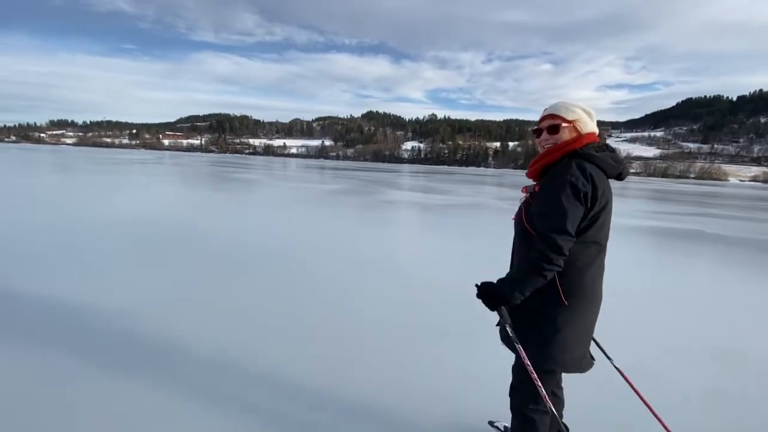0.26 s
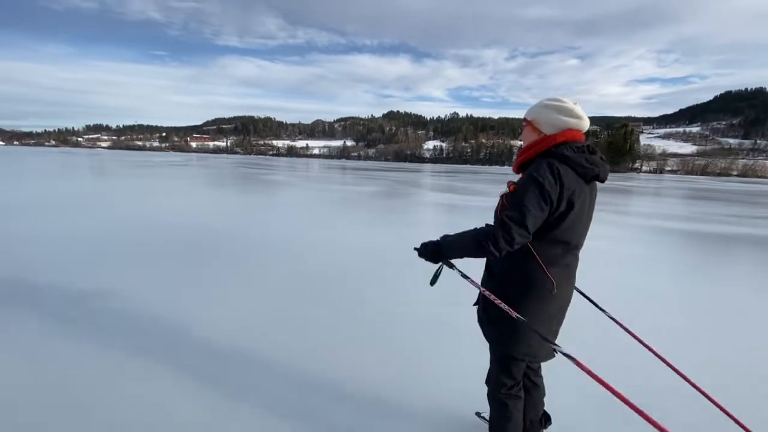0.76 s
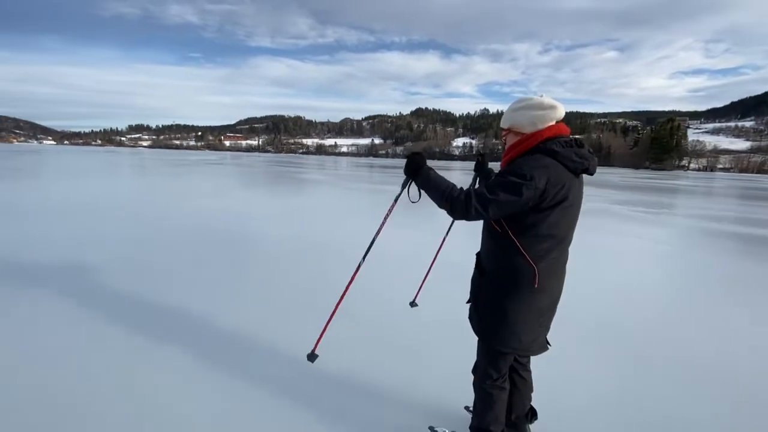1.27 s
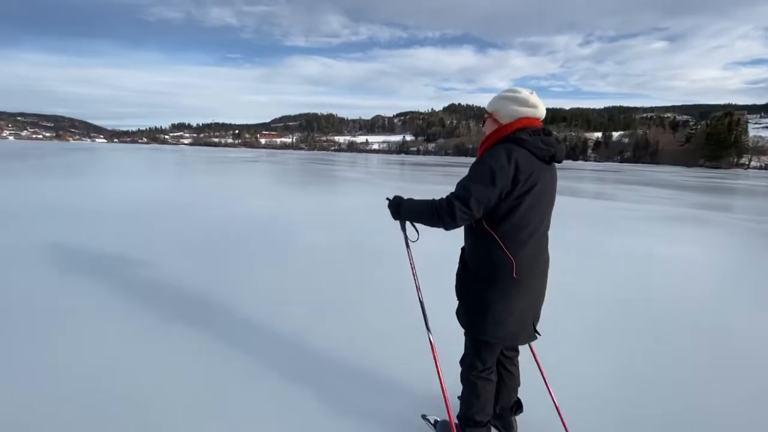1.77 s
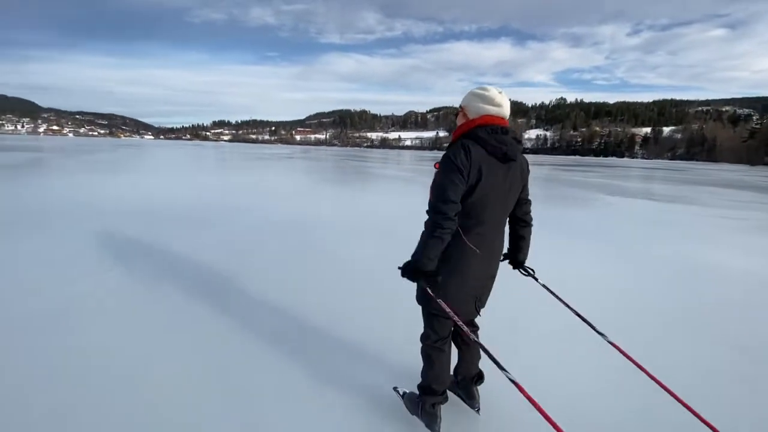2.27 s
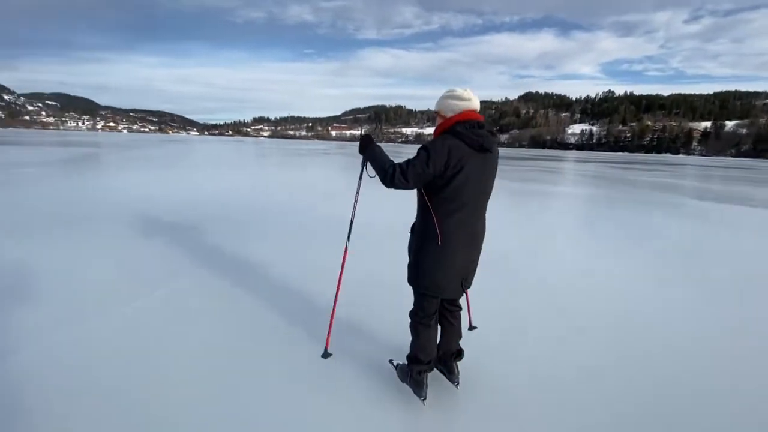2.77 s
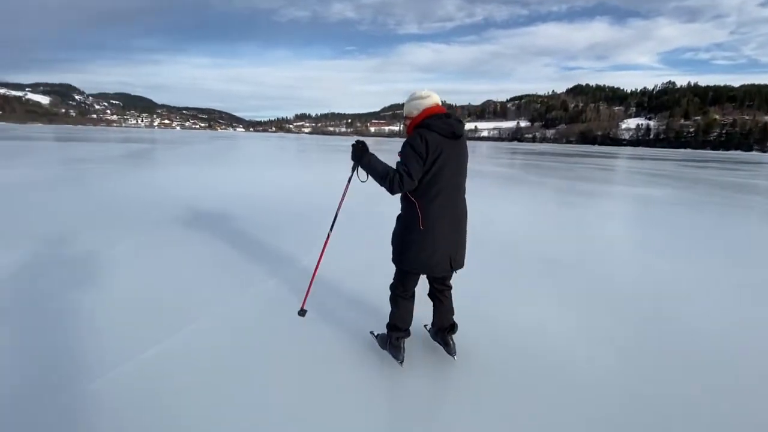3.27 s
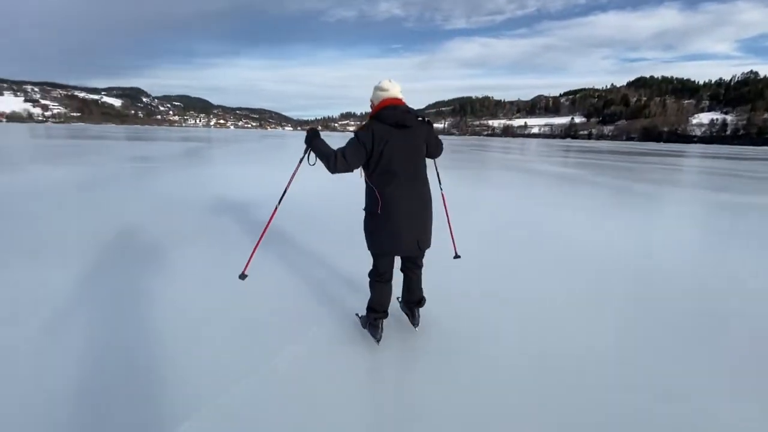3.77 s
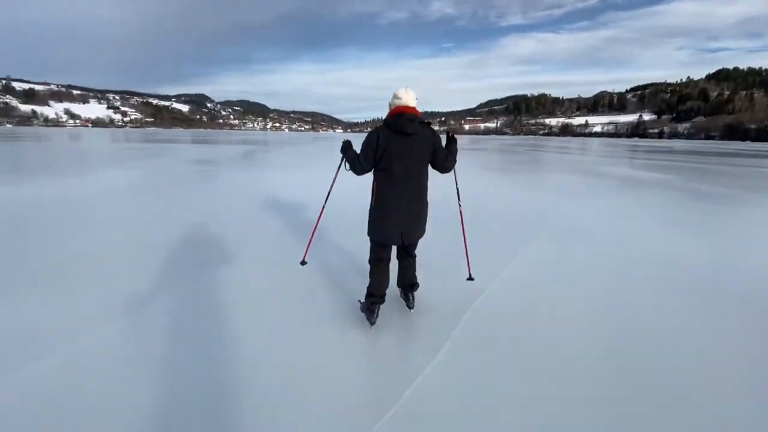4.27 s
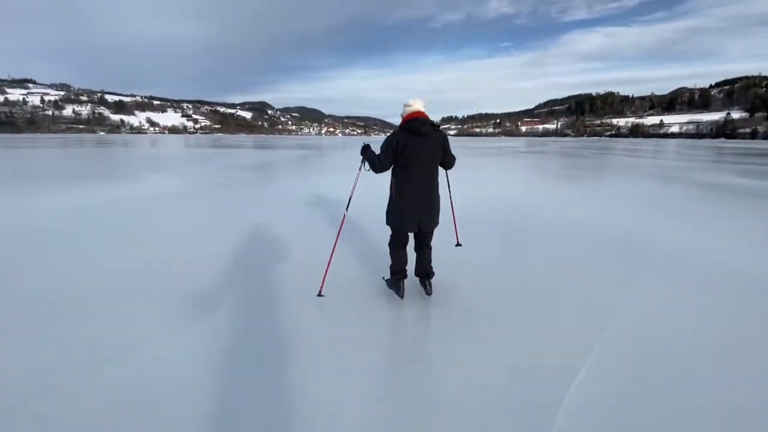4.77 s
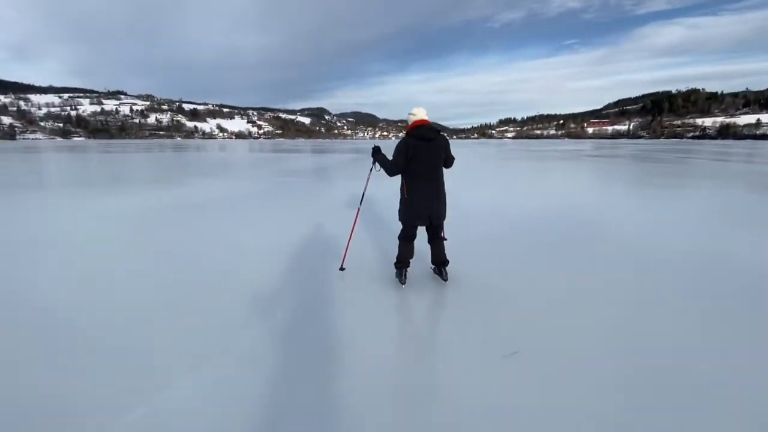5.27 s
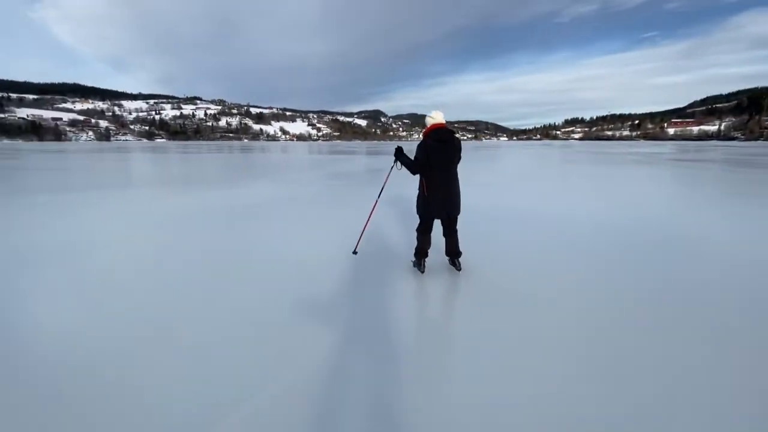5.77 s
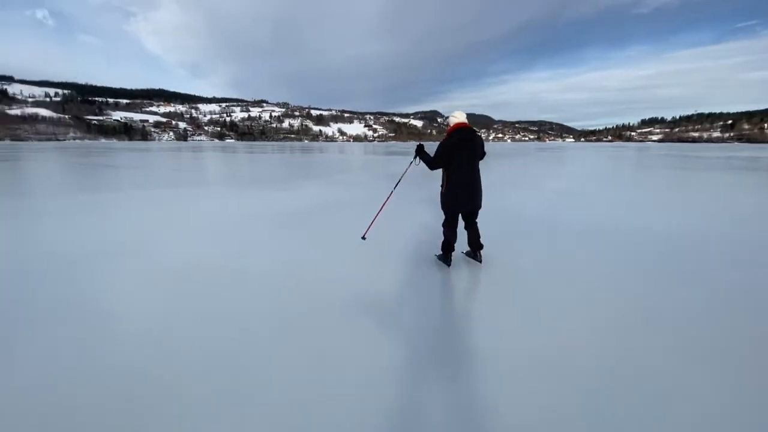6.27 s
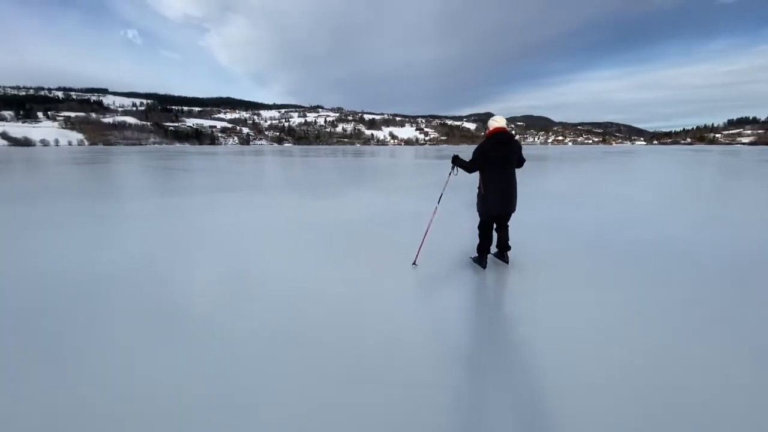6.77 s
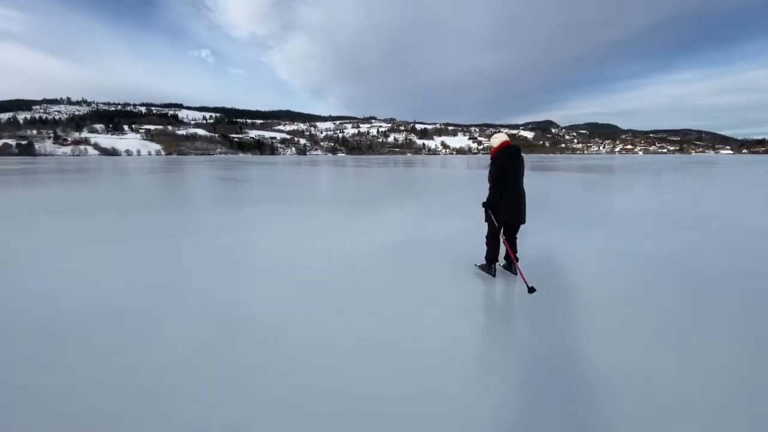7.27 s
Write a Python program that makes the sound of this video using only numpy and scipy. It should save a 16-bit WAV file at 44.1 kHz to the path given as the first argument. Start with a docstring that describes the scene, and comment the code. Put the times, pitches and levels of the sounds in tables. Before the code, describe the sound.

Hollow, downward-bending pole knocks ring through lake ice, busiest in the first three seconds, over gritty blade glide, edge rasps and soft wind rumble.

```python
"""Lake ice: skates and pole tips, heard by a small microphone carried by a second skater.
Each blow bends the ice sheet; treble runs faster through it than bass, so knocks fall in pitch.
Flat blades hiss and rumble as filtered grainy noise; edged blades rasp through steel resonances and jolt
at cracks. Boots thud, a loaded edge chatters, a thin whistle drifts and wind buffets the microphone port."""
import sys
import numpy as np
from scipy import signal
from scipy.fft import rfft, irfft, next_fast_len
from scipy.io import wavfile
from scipy.ndimage import uniform_filter1d, map_coordinates

SR = 44100
rng = np.random.default_rng(int(sys.argv[2]) if len(sys.argv) > 2 else 0)


def output_pcm(signal):
    """Save a mono or channel-first signal as 16-bit PCM at the path in sys.argv[1].

    Samples are clipped to [-1, 1] before scaling.
    """
    pcm = np.clip(np.atleast_2d(signal).T, -1, 1) * 32767
    wavfile.write(sys.argv[1], SR, np.round(pcm).astype(np.int16))


N = 331191

RUMBLE_DB, RUMBLE_FOLLOWS = -48.5, 0.86  # rumble before its wobble; share of the hiss's swings it follows
RATTLE_S, RATTLE_DB = 0.002005, -13.5  # a tip or blade meets the ice a few more times: latest delay, strength
CRUMBLE_DB, CRUMBLE_FADES = -29.5, 0.41  # crumbling under a 0 dB blow; dB more for each dB softer
BRIGHTER = 0.19  # exponent of the crack's treble tilt for each e-fold of knock pitch
BITE_S, LIFT_S = 0.0055, 0.02  # how fast the edge takes hold and lets go
# rise from bite to hardest, fall from there to lift: grind, ring, spray
SWELL_DB, SAG_DB = (7, 8, 4.5), (5, 8.5, 5.5)
DULLS_DB_PER_S = 0.8  # the top of the sliding sound fades as the skater draws away
CHATTER_WIDTH = 0.11  # half width of the band over its first pitch
TOP_HZ = 16900  # band limit


def amp(db):
    """Level to amplitude: 20 dB is a factor of ten."""
    return 10 ** (np.asarray(db) / 20)


def unit(x):
    """Power normalisation: scaled to rms 1."""
    return x / np.sqrt(np.mean(x ** 2) + 1e-20)


def peak(x):
    """Peak normalisation: scaled to a largest magnitude of 1."""
    return x / np.abs(x).max()


def along(points, hz):
    """Spectral envelope: gain of (Hz, dB) points on a log axis, shut beyond the ends."""
    f, db = np.transpose(points)
    return amp(np.interp(np.log(hz + 1), np.log(f + 1), db, -120, -120))


def curves(rows, outside=None):
    """Linear interpolation: one value per sample for each column after the time."""
    s, *cols = np.transpose(rows)
    return [np.interp(np.arange(N) / SR, s, c, outside, outside) for c in cols]


def wobble(rate):
    """Band-limited fluctuation: a smooth random curve, rate knots a second."""
    knots = rng.standard_normal(int(N * rate / SR) + 4)
    return map_coordinates(knots, [np.arange(N) * rate / SR])


def filtered(x, response):
    """Convolution theorem: the spectrum of x times a response of frequency."""
    m = next_fast_len(len(x) + 8192)
    return irfft(rfft(x, m) * response(np.fft.rfftfreq(m, 1 / SR)), m)[:len(x)]


def resonance(f, hz, width_hz):
    """Damped oscillator: a causal band of gain 1 at its centre."""
    return 1j * f * width_hz / (hz * hz - f * f + 1j * f * width_hz)


def below(f, hz):
    """Low-pass response: the share of the sound under a soft corner."""
    return 1 / np.sqrt(1 + (f / hz) ** 8)


def grit(response, spiky_db, lumpy_db, patchy_db=1.73):
    """Brittle fracture noise: grain sizes jump, come in lumps, and the colour drifts as the surface changes."""
    grain_gain = amp(spiky_db * wobble(900) + lumpy_db * wobble(90))
    z = signal.stft(grain_gain * rng.standard_normal(N), nperseg=512)[2]
    # smooth over frequency, then over time
    patches = uniform_filter1d(rng.standard_normal(z.shape), size=5, axis=0)
    patches = uniform_filter1d(patches, size=24, axis=1)
    grains = signal.istft(z * amp(patchy_db * unit(patches)), nperseg=512)[1][:N]
    return unit(filtered(grains, response))


def glide():
    """Sliding friction: flat blades hiss and rumble; a fainter glide is also duller."""
    # hiss of the flat blades: (time [s], level [dB])
    glide_level = [(0, -52.5), (2.4, -53.5), (3.2, -52.5), (3.65, -53.5), (4.0, -54), (4.6, -57),
                   (5.35, -50), (5.6, -58), (5.9, -56.5), (6.45, -52), (6.7, -54), (7.51, -50.5)]
    # spectrum of the hiss: (frequency [Hz], gain [dB])
    hiss_colour = [(900, -9.5), (1500, -3), (2700, -5.5), (3200, -7), (7300, -15), (8000, -17),
                   (15600, -17.5), (15900, -80)]
    # spectrum of the rumble: (frequency [Hz], gain [dB])
    rumble_colour = [(110, -7), (220, 3), (500, -3.5), (950, -6), (1600, -18.5), (2500, -19.5)]
    hiss_db, = curves(glide_level)
    swing_db = hiss_db - hiss_db.mean()
    rumble_db = RUMBLE_DB + RUMBLE_FOLLOWS * swing_db
    hiss = grit(lambda f: along(hiss_colour, f), 1.47, 1.9, 2.54)
    sheen = filtered(hiss, lambda f: f > 7600)
    hiss = amp(hiss_db) * (hiss - sheen + amp(0.89 * swing_db - 2.5) * sheen)
    rumble = grit(lambda f: along(rumble_colour, f), 1.9, 3.2, 2.94)
    return hiss + amp(rumble_db + 1.2 * wobble(13)) * rumble


def wind():
    """Turbulent pressure: lumpy low swings at the microphone port."""
    # strength of the wind: (time [s], buffet level [dB])
    gusts = [(0, -46), (.6, -44), (1.1, -38.5), (1.5, -48.5), (2.2, -42.5), (3.0, -49), (3.8, -47.5),
             (4.3, -41), (4.6, -44.5), (5.25, -37.5), (5.5, -40), (5.8, -34), (5.95, -43.5), (6.5, -36),
             (6.75, -37.5), (7.05, -43.5), (7.51, -61)]
    # spectrum of the buffets: (frequency [Hz], gain [dB])
    buffet_colour = [(18, -35), (40, -7.5), (65, -0.5), (110, -5), (200, -14), (400, -52)]
    noise = filtered(rng.standard_normal(N), lambda f: along(buffet_colour, f))
    lumps = unit(amp(4 * wobble(18)) * noise)
    db, = curves(gusts)
    deep = filtered(lumps, lambda f: below(f, 66))
    # a stronger gust reaches lower
    return amp(db) * (lumps - deep + amp(0.46 * (db - db.mean())) * deep)


def blows():
    """Bending-wave dispersion: the sheet spreads each knock and thump; splintering comes through the air."""
    # blows on the ice: (time [s], knock peak [dB], knock pitch [Hz],
    # thump over knock [dB], crack over knock [dB])
    impacts = [(0.015, -21, 1470, -8.5, -2.5), (0.27, -22, 900, -5.5, -5), (0.282, -24, 1070, -5, -5.5),
               (0.474, -24.5, 640, 3.5, -4), (0.701, -21.5, 1020, 2, -6), (0.726, -28.5, 730, 5, -6.5),
               (1.082, -12, 870, -2.5, -25), (1.166, -22.5, 1460, -0.5, -8), (1.213, -22, 845, -2, -11),
               (1.33, -17.5, 730, -5.5, -13.5), (1.386, -15.5, 720, -12, -11), (1.414, -9, 1840, -28, -7),
               (1.443, -14, 3360, -27, -7.5), (1.465, -23.5, 3700, -19, -7), (1.745, -14, 710, -5.5, -17.5),
               (2.077, -5.5, 795, -12.5, -13), (2.188, -19.5, 1640, -4.5, -8), (2.355, -16, 1380, -13, -13),
               (2.398, -23.5, 1120, 0.5, -7.5), (2.414, -24, 640, -2, -4), (2.434, -24.5, 1390, 0.5, -8),
               (2.455, -23, 674, -9, -10), (2.476, -20, 960, -2, -7), (2.504, -19.5, 1050, -10, -9),
               (2.512, -10, 990, -9, -2.5), (2.604, -22.5, 860, -8, -6), (2.666, -25, 1080, -8, -11.5),
               (2.737, -1, 846, -14, -12.5), (2.795, -11.5, 1110, -9.5, -19), (2.832, -26, 1470, -8, -11),
               (2.869, -26, 1090, -4, -23), (2.88, -5, 776, -10, -7.5), (3.431, -25.5, 2080, -5, -4.5),
               (3.443, -16, 690, -4, -13), (3.461, -6, 770, -13, -11.5), (3.496, -22.5, 627, -20, -10),
               (3.825, -14.5, 740, -1.5, -14.5), (4.061, -25, 1030, -3, -12), (4.2, -27, 820, 5, -8),
               (4.518, -29, 3500, -21, -1), (4.995, -11, 960, -10.5, -13.5), (5.314, -19.5, 2000, -6, -8),
               (5.318, -14, 970, 0, -12), (5.348, -23.5, 910, -17, -7), (5.954, -20, 950, -14, -14.5),
               (5.968, -25, 950, -5.5, -18), (6.371, -26.5, 1210, -14, -4), (6.473, -25, 1200, -16, -20),
               (6.534, -26.5, 3070, -22, 0), (6.691, -23, 780, -4.5, -10), (6.77, -22, 1250, -16, -11),
               (6.875, -20.5, 980, -7, -22), (6.883, -10.5, 1070, -2, -24), (7.47, -21, 1580, -14, -7.5)]
    # spectrum of the splintering: (frequency [Hz], gain [dB])
    crack_colour = [(1500, -53), (3000, -3.5), (5500, -1.5), (8000, -9), (13000, -12), (16500, -28)]
    out, size, lead = np.zeros(N + SR), 8192, 400
    f, t = np.fft.rfftfreq(size, 1 / SR), (np.arange(size) - lead) / SR
    splinters = rng.standard_normal((len(impacts), 2, size))
    delays = rng.random((len(impacts), 3, 1))

    def dying(before, after):
        """Exponential growth and decay: seconds per 60 dB before and after the blow."""
        return amp(-60 * np.where(t < 0, -t / before, t / after))

    crumbling = dying(0.011, 0.027) + 0.043 * dying(0.042, 0.28)
    splintering = dying(0.0014, 0.019) + 0.071 * dying(0.037, 0.12)
    # bending waves travel at a speed that grows with sqrt(f): delay = spread / sqrt(f);
    # the f / 110 term shifts every frequency earlier alike
    sheet = np.exp(-4j * np.pi * 0.0746 * (np.sqrt(f) - f / 110))
    # a second path off the ice leaves a notch near 1190 Hz
    bounce = 1 + 0.37 * np.exp(-2j * np.pi * f * 0.00042)
    body = (resonance(f, 305, 395) ** 2 + 0.97 * resonance(f, 202, 49)) * sheet
    air = along(crack_colour, f)
    for (s, db, knock_hz, thump_db, crack_db), (push, noise), late in zip(impacts, splinters, delays):
        rattle = 1 + amp(RATTLE_DB) * np.exp(-2j * np.pi * f * RATTLE_S * late).sum(axis=0)
        # a light touch crumbles the surface, a hard one bites at once
        crumble = amp(CRUMBLE_DB - CRUMBLE_FADES * db)
        force = rfft((t == 0) + crumble * push * crumbling)
        contact = resonance(f, knock_hz, 1085) ** 2 / (1 + 1j * f / (2.8 * knock_hz))
        knock = irfft(force * contact * sheet * bounce * rattle)
        thump = irfft(force * body)
        tilt = (f / 5000 + 0.16) ** (BRIGHTER * np.log(knock_hz / 1000))
        crack = irfft(rfft(noise * splintering) * air * rattle * tilt)
        blow = peak(knock) + amp(thump_db) * peak(thump) + amp(crack_db) * peak(crack)
        out[round(s * SR):][:size] += amp(db) * blow
    return out[lead:N + lead]


def jolts(hairlines):
    """Impulse response: a sliding blade's gain leaps at each crack, and at so many hairlines a second."""
    # a blade crosses a crack and jolts: (time [s], leap over the sliding sound [dB])
    crossings = [(0.124, 12.5), (0.316, 15), (0.598, 13.5), (0.833, 12), (0.869, 11.5), (1.121, 14),
                 (1.273, 15.5), (1.794, 9), (1.904, 9), (2.052, 10), (2.14, 13), (2.489, 19.5),
                 (3.319, 6.5), (3.966, 10.5), (4.044, 9), (4.294, 11.5), (4.848, 12.5), (5.151, 1),
                 (5.179, 1.5), (6.43, 12.5), (6.569, 9), (6.659, 11), (6.72, 10), (6.903, 18)]
    kicks = (rng.random(N) < hairlines / SR) * 1.11 * rng.random(N)
    for s, db in crossings:
        kicks[round(s * SR)] = amp(db)
    t = np.arange(SR // 20) / SR
    leap = amp(-60 * t / 0.017) * (1 - np.exp(-t / 0.00065))
    return 1 + signal.fftconvolve(kicks, leap / leap.max())[:N]


def steel(f, blade):
    """Modal superposition: the power of a blade's resonances adds to its broad rasp."""
    # spectrum of the rasp: (frequency [Hz], gain [dB])
    rasp_colour = [(100, -23), (250, -3.5), (1000, -11), (3000, -9), (7300, -26.5), (15600, -35),
                   (15900, -80)]
    modes = sum(amp(2 * db) * np.abs(resonance(f, hz, w)) ** 4 for hz, w, db in blade)
    return np.sqrt(along(rasp_colour, f) ** 2 + modes)


def pressure(pushes):
    """Contact load: gains of grind, ring and spray as each edge bites, bears down, eases and lifts."""
    out = np.zeros((3, N))
    for bite, hardest, lift, *peak_db in pushes:
        span = slice(round((bite - BITE_S) * SR), min(N, round((lift + LIFT_S) * SR)))
        t = np.arange(span.start, span.stop) / SR
        hold = np.clip(np.minimum((t - bite) / BITE_S + .5, (lift - t) / LIFT_S + .5), 0, 1)
        moments = (bite, hardest, lift)
        levels = [np.interp(t, moments, (db - swell, db, db - sag))
                  for db, swell, sag in zip(peak_db, SWELL_DB, SAG_DB)]
        out[:, span] += hold * amp(levels)
    return out


def shave(pushes, blade):
    """Cutting excitation: an edged blade makes the sheet grind, the steel ring and chips spray."""
    grind, ring, spray = pressure(pushes)
    low = grit(lambda f: steel(f, blade) * below(f, 1250), 2.3, 1.6)
    mid = grit(lambda f: steel(f, blade) * below(f, 2570) * (1 - below(f, 1010)), 1.8, 2.1)
    high = grit(lambda f: steel(f, blade) * (1 - below(f, 3170)), 2.0, 1.8)
    return grind * low + ring * mid + spray * high


def strokes():
    """Contact damping: both feet push off ringing; a scuffing blade lies on the ice and does not ring."""
    # push-offs and scuffs: (blade or scuff, bite [s], hardest [s], lift [s],
    # grind [dB], ring [dB], spray [dB])
    edge_pushes = [("scuff", 0.2, 0.221, 0.231, -34.5, -43, -46),
                   ("scuff", 1.386, 1.392, 1.408, -32.5, -42, -36),
                   ("left", 2.89, 3.0, 3.1, -33, -41.5, -43),
                   ("scuff", 3.316, 3.345, 3.365, -38, -47, -54.5),
                   ("scuff", 3.56, 3.588, 3.596, -45.5, -37.5, -38.5),
                   ("left", 3.71, 3.73, 3.865, -34, -35.5, -42.5),
                   ("scuff", 4.39, 4.45, 4.5, -53.5, -52, -51),
                   ("left", 4.735, 4.745, 4.83, -34, -33.5, -42),
                   ("right", 5.0, 5.17, 5.26, -34.5, -32, -41.5),
                   ("right", 5.935, 6.13, 6.295, -39.5, -36, -45),
                   ("scuff", 6.2, 6.25, 6.295, -47, -38, -36), ("scuff", 6.32, 6.37, 6.41, -44, -45, -46.5),
                   ("scuff", 6.5, 6.53, 6.54, -46, -39, -39.5), ("scuff", 6.77, 6.82, 6.865, -42, -36, -42),
                   ("scuff", 7.05, 7.4, 7.49, -48, -43, -51), ("left", 7.125, 7.2, 7.29, -36.5, -44.5, -62),
                   ("left", 7.33, 7.385, 7.465, -32, -39, -45)]
    # resonances of the left blade: (frequency [Hz], width [Hz], level [dB])
    left_modes = [(478, 200, 2.5), (960, 200, -3.5), (1530, 180, 0.5), (2465, 210, 5.5), (3880, 270, -3.5)]
    # resonances of the right blade: (frequency [Hz], width [Hz], level [dB])
    right_modes = [(936, 380, -2), (1358, 250, -1.5), (2600, 340, 7)]
    blades = {"left": left_modes, "right": right_modes, "scuff": []}
    return sum(shave([row[1:] for row in edge_pushes if row[0] == kind], blade)
               for kind, blade in blades.items())


def sliding():
    """Amplitude modulation: jolts scale edged and flat blades; a loaded edge hardly feels the hairlines."""
    both = jolts(25) * strokes() + jolts(80) * glide()
    top = filtered(both, lambda f: 1 - below(f, 13500))
    return both - top + amp(2.0 - DULLS_DB_PER_S * np.arange(N) / SR) * top


def thuds():
    """Damped oscillation: soft pushes of a few low cycles that swell, sink in pitch and die."""
    # boots rocking on the blades: (time [s], envelope peak [dB], starting pitch [Hz])
    boot_pushes = [(0.209, -30.5, 297), (0.736, -34, 470), (0.811, -22, 122), (1.118, -28, 101),
                   (1.229, -28.5, 255), (1.36, -29, 426), (1.398, -26.5, 417), (1.76, -20, 230),
                   (5.319, -18, 247), (6.7, -32, 460), (6.899, -27, 104), (6.968, -20.5, 190),
                   (7.025, -28.5, 180.5)]
    out, t = np.zeros(N + SR), np.arange(SR // 10) / SR
    swell = peak(amp(-60 * t / 0.049) * (1 - np.exp(-t / 0.0047)))
    for s, db, hz in boot_pushes:
        cycles = np.sin(2 * np.pi * hz * t * (1 - 3.5 * t))
        out[round(s * SR):][:len(t)] += amp(db) * swell * cycles
    return out[:N]


def whistle():
    """Frequency modulation: a faint, fuzzy high line that drifts in pitch."""
    # centre of the line before its wobble: (time [s], pitch [Hz], level [dB])
    whistle_line = [(3.95, 11200, -72), (4.16, 11300, -70), (4.43, 11300, -71), (4.75, 10850, -66)]
    hz, _ = curves(whistle_line)
    _, db = curves(whistle_line, -120)
    return amp(db + 4.5 * wobble(60)) * np.sin(2 * np.pi * np.cumsum(hz + 80 * wobble(300)) / SR)


def chatter():
    """Heterodyning: low noise times a sliding tone is a narrow, grainy band that swells and fades."""
    # a loaded edge chatters in one narrow band:
    # (start [s], end [s], first pitch [Hz], last pitch [Hz], level [dB])
    bands = [(6.211, 6.293, 4690, 4700, -42), (6.208, 6.29, 1350, 1400, -39.5),
             (6.326, 6.404, 1250, 1220, -35.5)]
    out = np.zeros(N)
    for start, end, first_hz, last_hz, db in bands:
        u = np.linspace(0, 1, round((end - start) * SR))
        grains = amp(2.3 * wobble(203)[:len(u)]) * rng.standard_normal(len(u))
        fuzz = filtered(grains, lambda f: below(f, CHATTER_WIDTH * first_hz))
        turn = 2 * np.pi * np.cumsum(first_hz + (last_hz - first_hz) * u) / SR
        swell = np.sqrt(np.sin(np.pi * u).clip(0))
        out[round(start * SR):][:len(u)] += amp(db) * swell * unit(fuzz * np.sin(turn))
    return out


def scene():
    """Linear superposition: everything that reaches the microphone."""
    return (blows() + thuds() + sliding() + chatter() + whistle() + wind())[None]


def record(dry):
    """Cavity resonance: the port lifts a few treble bands; nothing is kept above the band limit."""
    # resonances of the microphone port: (frequency [Hz], width [Hz], lift [dB])
    port_modes = [(4940, 200, 4.5), (5770, 72, 7), (6760, 380, 8)]

    def port(f):
        """Resonant gain: the lifts add in decibels."""
        return amp(sum(db * np.abs(resonance(f, hz, w)) ** 2 for hz, w, db in port_modes))

    return filtered(dry[0], lambda f: port(f) * (f < TOP_HZ))[None]


dry = scene()
out = record(dry)
output_pcm(out)
```